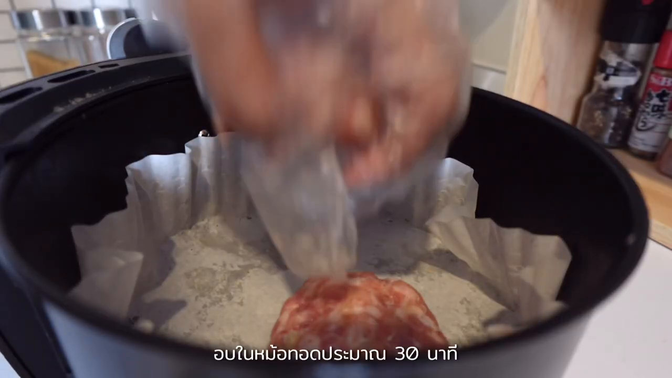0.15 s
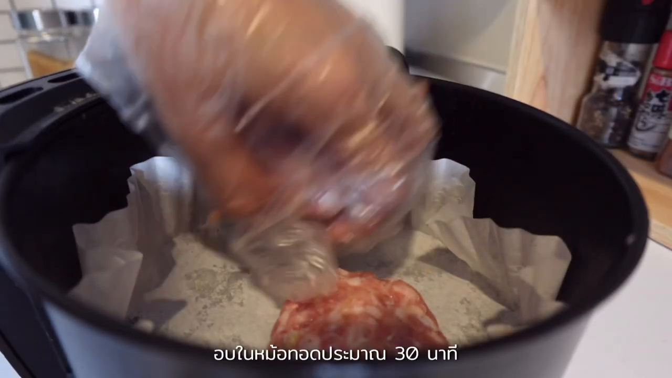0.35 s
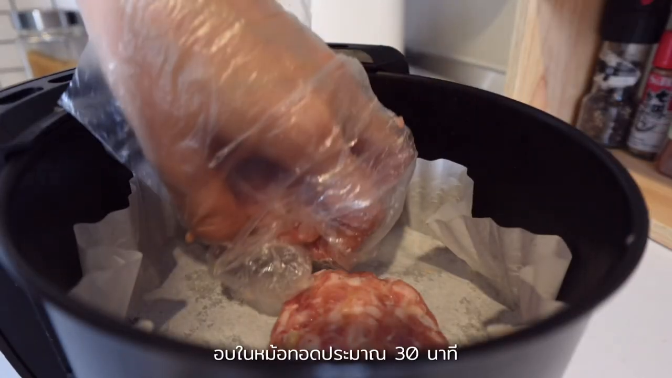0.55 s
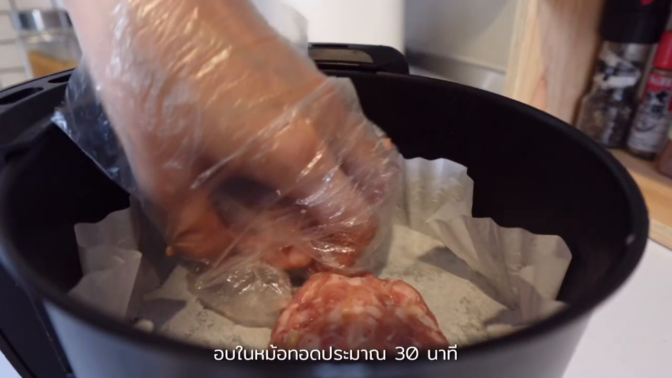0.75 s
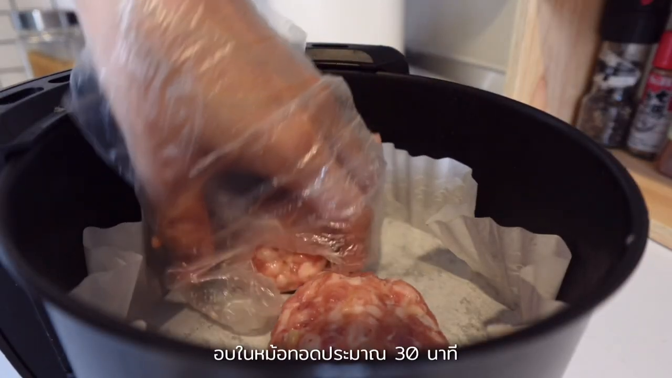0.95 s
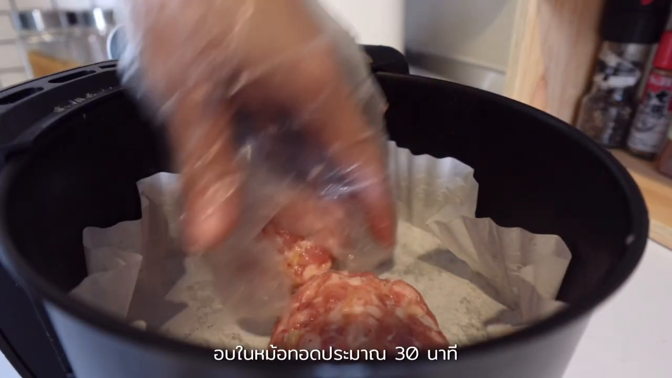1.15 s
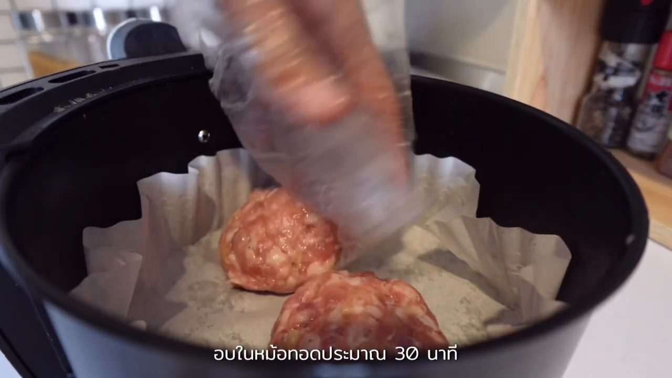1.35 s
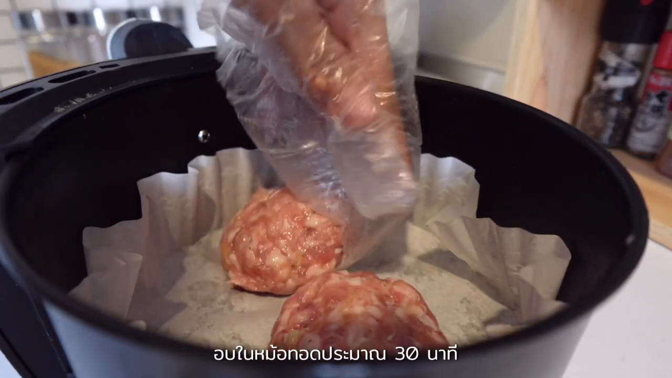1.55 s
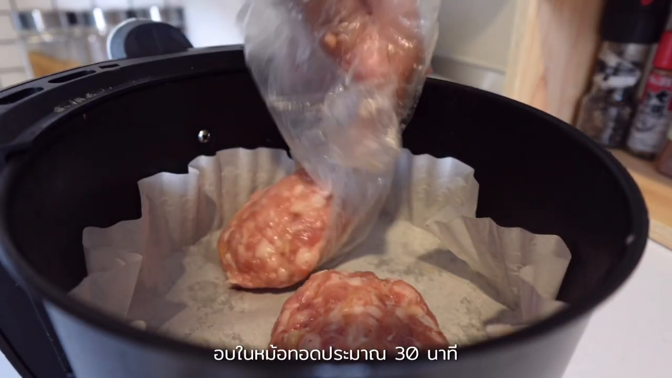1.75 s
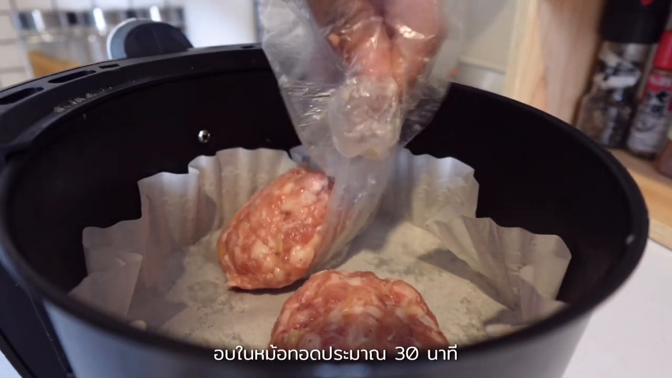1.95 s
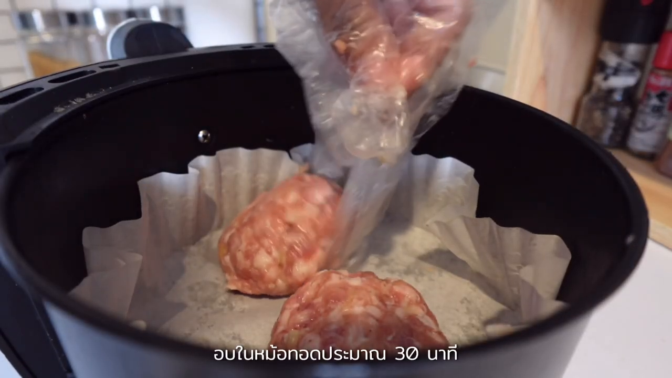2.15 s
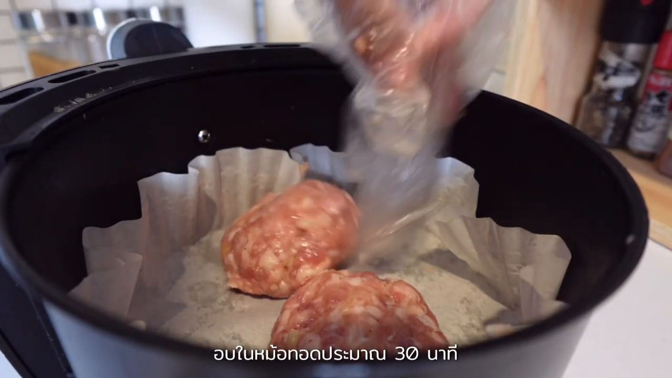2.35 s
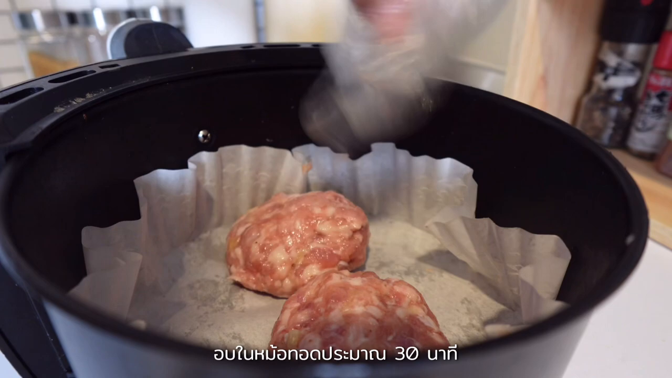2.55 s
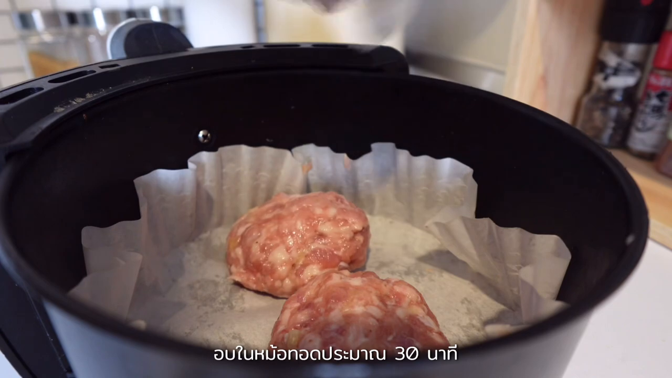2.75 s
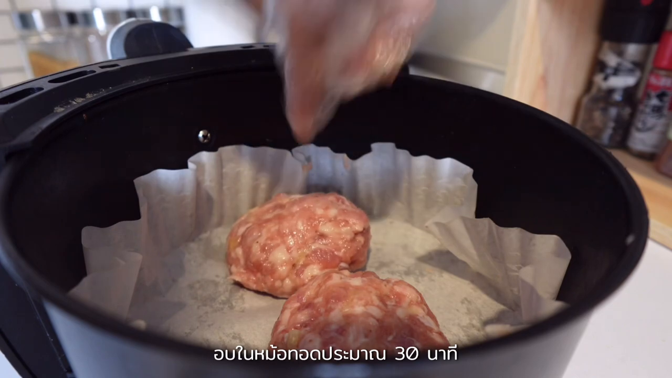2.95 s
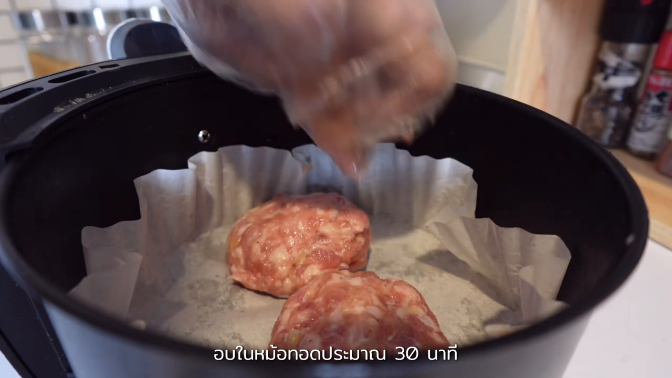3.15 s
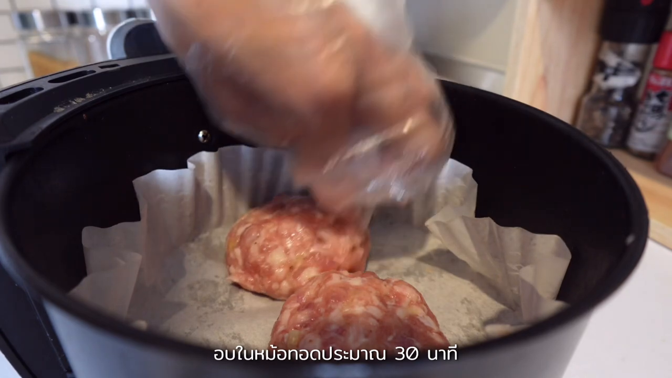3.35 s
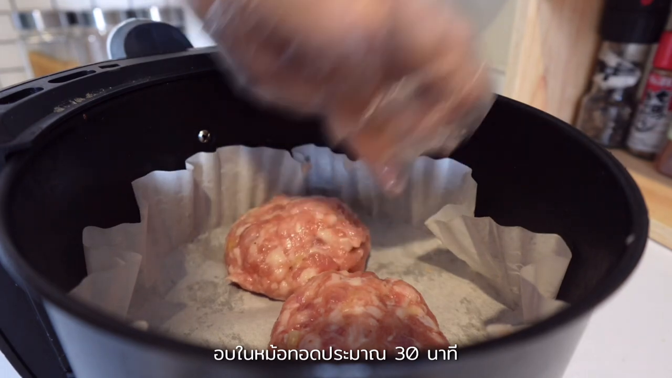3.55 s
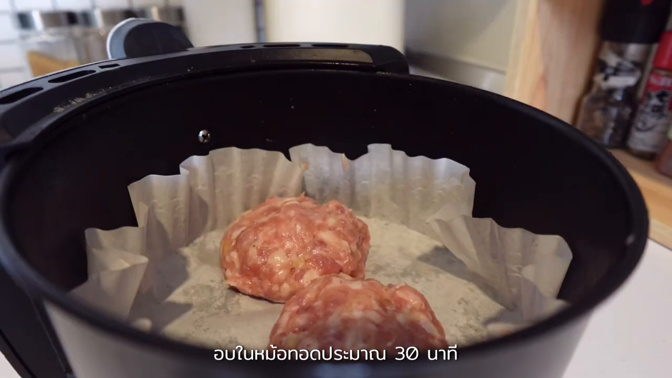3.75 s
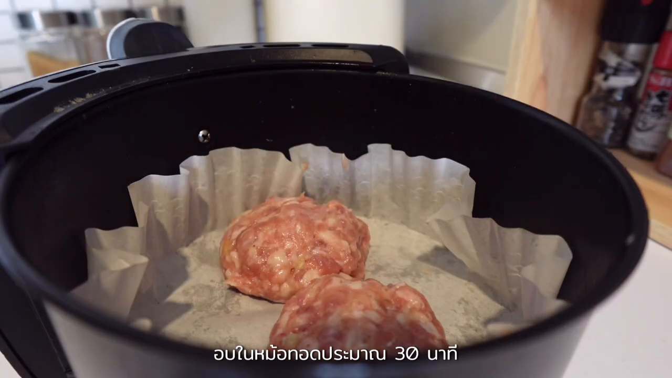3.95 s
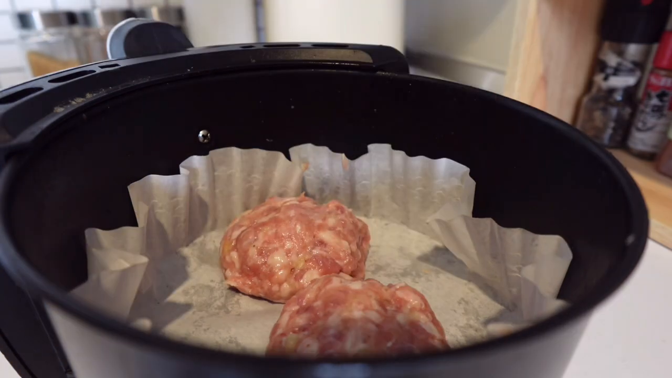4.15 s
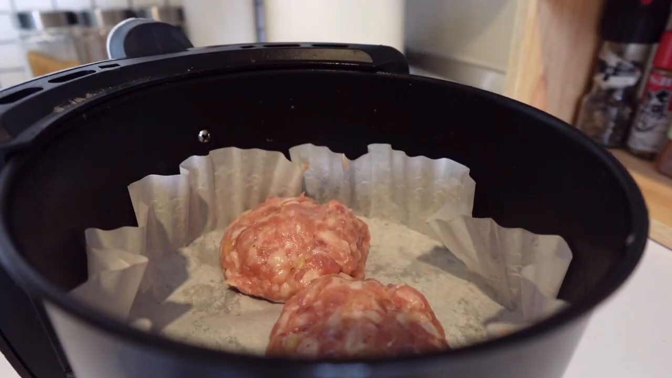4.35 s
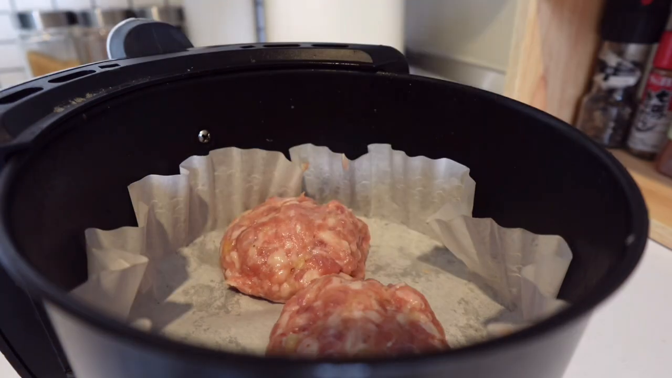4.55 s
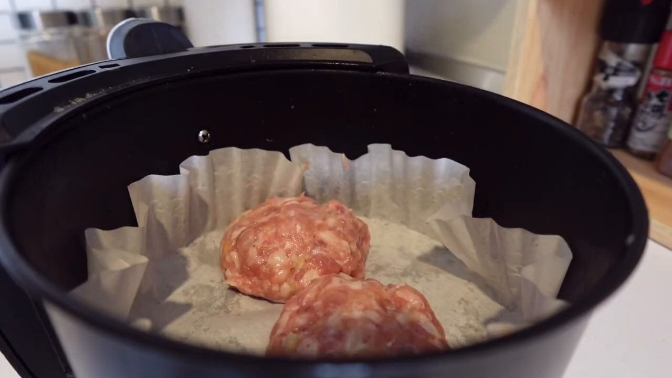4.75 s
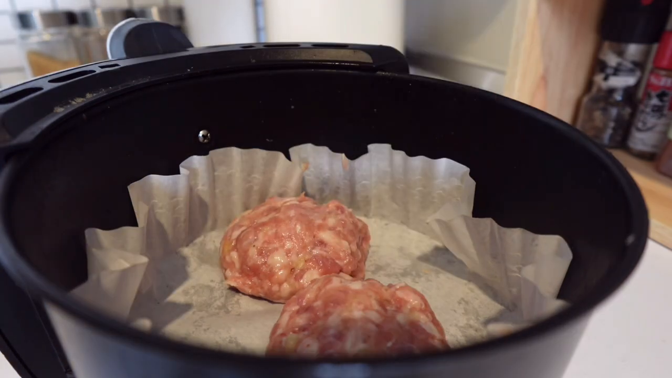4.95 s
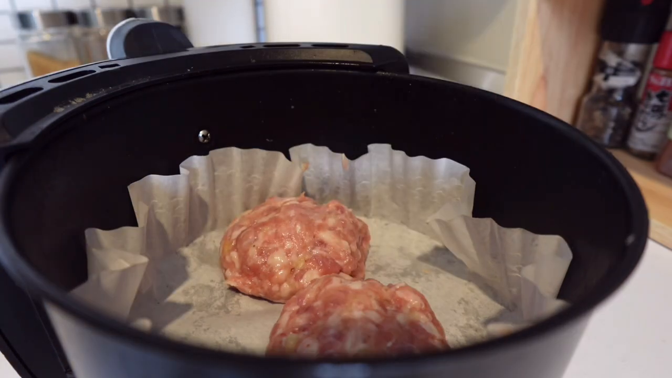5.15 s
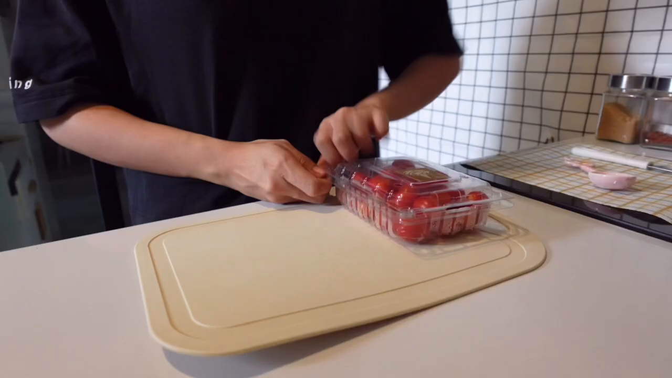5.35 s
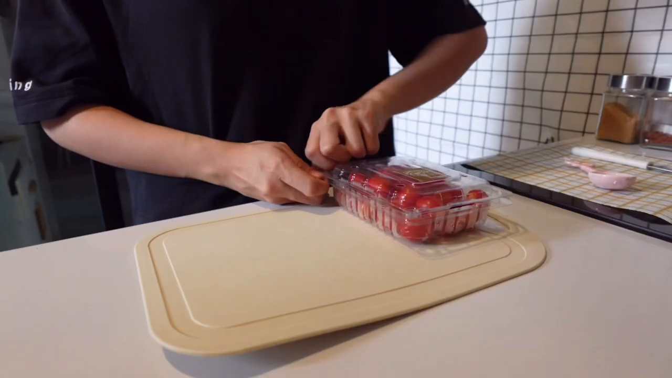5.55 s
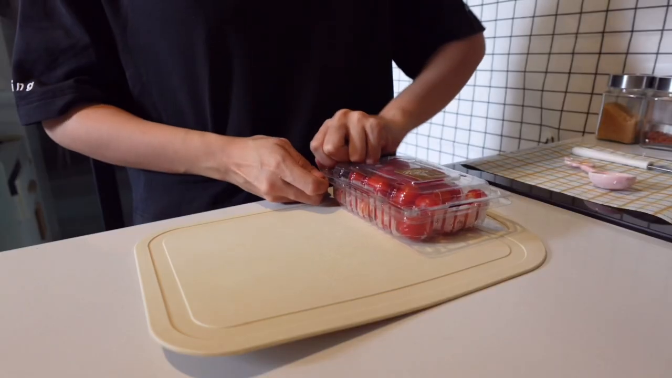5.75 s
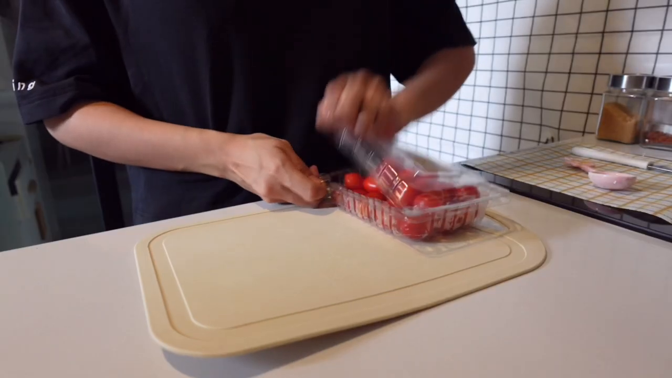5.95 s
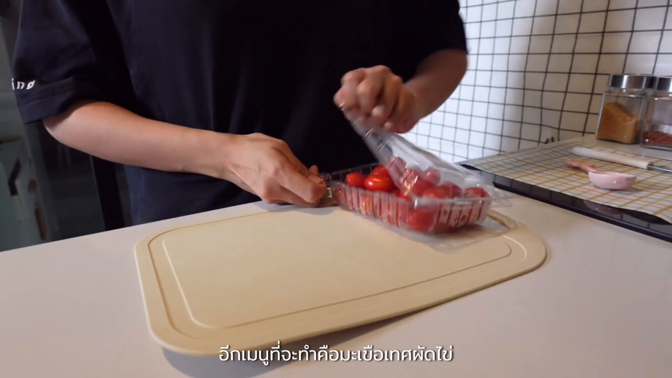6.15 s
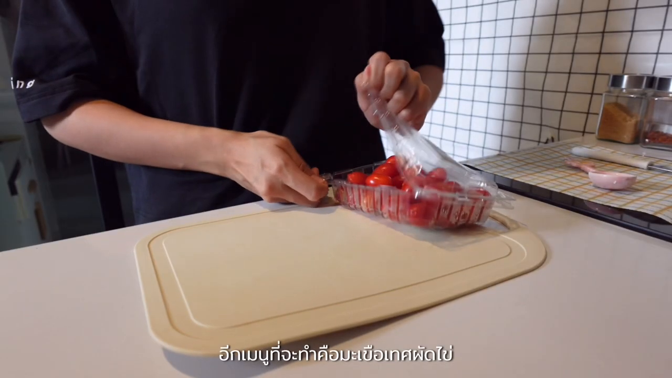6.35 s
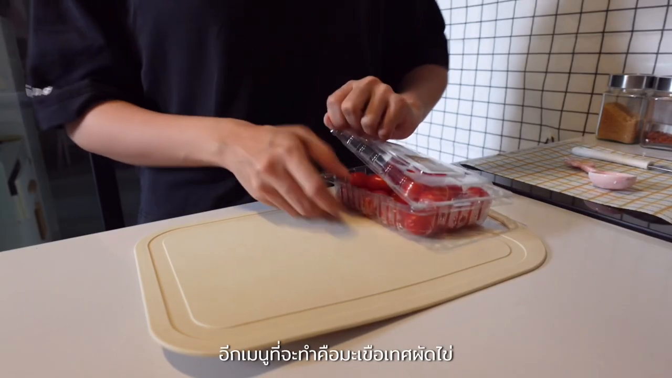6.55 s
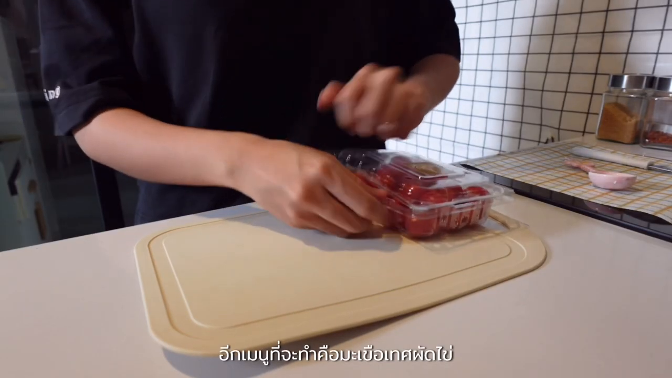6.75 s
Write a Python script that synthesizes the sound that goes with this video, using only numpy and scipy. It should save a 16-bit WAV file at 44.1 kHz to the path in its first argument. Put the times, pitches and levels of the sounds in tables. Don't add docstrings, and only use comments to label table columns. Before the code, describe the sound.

Very close, a thin plastic glove rustles and crackles in uneven squeezes inside a pot, with crisp fold pops and a few short dull paper dents. It stops at a cut, leaving quiet room hum and a faint motor whine. Then, slightly farther off and a little right, a stiff plastic fruit box clicks, snaps and cracks open over louder room hum.

```python
import sys
import numpy as np
from scipy import signal
from scipy.fft import rfft, irfft
from scipy.io import wavfile
from scipy.ndimage import uniform_filter1d

SR = 44100
rng = np.random.default_rng(int(sys.argv[2]) if len(sys.argv) > 2 else 0)


def store_pcm(level_fs):
    pcm = np.round(np.clip(level_fs, -1, 1) * 32767).astype(np.int16)
    wavfile.write(sys.argv[1], SR, np.atleast_2d(pcm).T)


def volts_from_db(level):
    exponent = np.asarray(level, float) / 20
    return 10 ** exponent


N = 304290
T = np.arange(N) / SR

SCENE_CHANGES = [3.722, 5.365]

# pitch in Hz, width in Hz, lift in dB.
POT_RINGS = [(1350, 134, 0), (2055, 76, -2), (2520, 16, -4.5)]
# pitch in Hz, level in dB.
FILM_TONE = [(300, -10), (600, 0.5), (1000, -3.5), (1600, 2), (2400, 1), (4500, -2), (9000, 0), (15000, -1)]
# pitch in Hz, width in Hz, lift in dB.
FILM_RINGS = [(2000, 50, -35), (3500, 310, -13.5), (4540, 1040, -8)]


def glove_film():
    db, depth = hand()
    low_db = db - 19.5 + 24.5 * depth
    high_db = db - 2.5 * depth + 4.5 * np.tanh((T - 1.08) / 0.058) / 2
    folds = level(crackle(1200, spread_db=3, smear_s=.0011), 0) + .9
    low, mid, high = (band(folds * volts_from_db(.8 * walk(25.4)) * rng.standard_normal(N), k) for k in range(3))
    low = colour(low, modes=[(hz, width, db_lift + 4.6) for hz, width, db_lift in POT_RINGS])
    flap = level(ring(folds * rng.standard_normal(N), 320, 0.4), -19)
    close = volts_from_db(db) * (level(mid, 0) + flap)
    close = close + volts_from_db(low_db) * level(low, 0) + volts_from_db(high_db) * level(high, 0)
    close = close - 0.49 * ring(close, 2326, 0.087)
    fade = np.exp(-(T - SCENE_CHANGES[0]) / 0.6) * (T < SCENE_CHANGES[1])
    leaving = volts_from_db(-68.5) * fade * level(mid + .5 * high, 0)
    return np.where(T < 3.752, colour(close, FILM_TONE, FILM_RINGS), leaving)


# middle in seconds, strength in dB, length in seconds, depth in the pot from 0 to 1.
SQUEEZES = [(0.07, -46, 0.2, 0.32), (0.316, -40.5, 0.05, 0.54), (0.39, -37.0, 0.15, 0.6),
            (0.646, -43, 0.1, 0.72), (0.756, -37.5, 0.19, 0.57), (0.841, -30, 0.045, 0.68),
            (1.07, -50, 0.035, 0.65), (1.145, -34.5, 0.24, 0.63), (1.364, -40.4, 0.086, 0.42),
            (1.507, -38.4, 0.072, 0.64), (1.647, -34.5, 0.1, 0.57), (1.795, -42.5, 0.0098, 0.2),
            (1.903, -39.5, 0.1, 0.36), (2.06, -41.5, 0.18, 0.43), (2.182, -39.5, 0.052, 0.31),
            (2.352, -36.5, 0.056, 0.06), (2.396, -36, 0.13, 0.73), (2.545, -31.5, 0.062, 0.3),
            (2.602, -35.5, 0.087, 0.35), (2.703, -31.5, 0.12, 0.26), (2.817, -28.5, 0.062, 0.34),
            (2.935, -34, 0.034, 0.25), (3.019, -40.5, 0.069, 0.37), (3.123, -43, 0.099, 0.4),
            (3.368, -45.5, 0.086, 0.76), (3.524, -56.8, 0.023, 0.3), (3.738, -51.6, 0.048, 0.58)]


def hand():
    power, weighted = volts_from_db(2 * -67), 0
    for s, db, length_s, depth in SQUEEZES:
        squeeze = volts_from_db(2 * db) * np.exp(-2 * np.abs(T - s) / length_s)
        power = power + squeeze
        weighted = weighted + depth * squeeze
    return 10 * np.log10(power) - 3, weighted / power


# start in seconds, peak in dB, ring in Hz, share of low sound in dB.
POPS = [(0.1861, -37, 3850, -15), (0.2435, -37, 4690, -28), (0.2954, -33, 4310, -4),
        (0.5788, -32, 3830, -13), (0.8031, -26, 3270, -8), (0.8303, -20, 3400, -12),
        (0.8445, -17, 2600, -2), (0.8546, -17, 2890, -15), (0.8659, -31, 1660, 12),
        (0.8748, -23, 3680, -23), (0.9539, -29, 3680, -3), (1.6951, -34, 2130, 3), (1.7879, -36, 7990, -27),
        (1.894, -32, 5280, -10), (1.9548, -27, 6120, -25), (1.9684, -31, 4200, -7),
        (2.0607, -31, 5020, -14), (2.4101, -33, 1550, 4), (2.5213, -29, 6370, -5), (2.5378, -31, 7450, 0),
        (2.8364, -22, 3340, -9), (3.343, -41, 6740, -11), (3.3674, -36, 4760, -8), (3.3975, -33, 3450, -18),
        (3.4752, -43, 2690, -11), (3.5129, -44, 4240, -13), (3.54, -44, 5210, -14),
        (3.5701, -43, 4670, -33), (3.5992, -48, 3890, -24), (3.6862, -41, 5870, -16)]
# ring in Hz, share of high sound in dB.
POP_TREBLE = [(3000, -8), (4000, -8), (6000, 5)]


def film_pops():
    pops = []
    for s, db, hz, low_db in POPS:
        high_db = np.interp(hz, *np.transpose(POP_TREBLE))
        pops.append((s, db, low_db, high_db, hz, .0017))
    return ticks(pops, width=.3, ring_db=-5)


# start in seconds, peak in dB, ring in Hz, push in seconds, share of high sound in dB.
DENTS = [
    (1.7215, -16.5, 1710, .003, -22),
    (2.461, -13.5, 1830, .0043, -13),
    (3.413, -24, 2090, .006, -16),
    (3.728, -38.5, 4750, .0096, 7),
]
# pitch in Hz, level in dB.
THIN_TONE = [(400, -15), (800, -9), (1150, -4), (16000, -4)]


def paper_dents():
    dents = [(s, db, -4, high_db, hz, push_s) for s, db, hz, push_s, high_db in DENTS]
    return colour(ticks(dents, width=.25, ring_db=0), THIN_TONE)


# start in seconds, peak in dB, share of low sound in dB,
# share of high sound in dB, ring in Hz, push in seconds.
SQUEAK = [
    (3.616, -67.5, 5.5, -15, 2140, .028),
]


def finger_squeak():
    return ticks(SQUEAK, width=.14, ring_db=14)


def box():
    folds = level(crackle(600, spread_db=0.5, smear_s=0.0036), 0) + .9
    snaps = catches_and_clicks() + lid_cracks() + finger_knocks()
    return box_handling(folds) + swells(folds) + snaps + box_thud()


# start in seconds, peak in dB, ring in Hz.
CATCHES = [
    (5.8772, -12, 5040),
    (5.8778, -16, 3000),
    (6.1978, -10, 3510),
    (6.2634, -8, 4220),
    (6.3845, -25, 6160),
]
# start in seconds, peak in dB, ring in Hz.
CLICKS = [(5.4049, -37, 6000), (5.553, -24, 5230), (5.575, -25, 7000), (5.6561, -26, 6870),
          (5.6858, -22, 6850), (6.4772, -30, 2820), (6.7095, -34, 4870), (6.7289, -15, 8200)]


def catches_and_clicks():
    catches = with_tone(CATCHES, low_db=-30, high_db=-20, push_s=.001)
    clicks = with_tone(CLICKS, low_db=-12, high_db=2, push_s=.0006)
    return colour(ticks(clicks + catches, width=.14, ring_db=2), THIN_TONE)


# start in seconds, peak in dB, ring in Hz, push in seconds.
CRACKS = [
    (5.5768, -9.5, 1250, .003),
    (5.9059, -10, 1500, .0013),
    (6.7155, -24, 1310, .006),
]


def lid_cracks():
    cracks = [(s, db, -1, 0, hz, push_s) for s, db, hz, push_s in CRACKS]
    return colour(ticks(cracks, width=.3, ring_db=-1), THIN_TONE)


# start in seconds, peak in dB, ring in Hz.
KNOCKS = [(5.3725, -47, 1400), (5.5301, -42, 710), (6.0913, -43, 1380), (6.1228, -43, 1530),
          (6.1905, -36, 950), (6.227, -39, 1200), (6.3234, -36, 1000), (6.4702, -37, 1400),
          (6.5138, -35, 1400), (6.6593, -47, 1440), (6.7215, -26, 1350), (6.7243, -24, 2100),
          (6.8644, -38, 1360)]


def finger_knocks():
    knocks = with_tone(KNOCKS, low_db=11, high_db=-14, push_s=.002)
    return volts_from_db(-4) * ticks(knocks, width=.3, ring_db=1)


# start in seconds, peak in dB, ring in Hz, swell in seconds, share of low sound in dB.
LID_SWELLS = [(5.366, -40.5, 1320, 0.01, 6.5), (5.579, -17, 1225, .025, 0.5),
              (5.686, -34, 2530, 0.018, -16), (5.907, -13, 2470, .029, -3), (6.188, -42, 940, 0.00038, 16),
              (6.47, -39, 1350, .01, 6.5), (6.511, -52, 1400, 0.0068, 9), (6.715, -25, 1365, 0.017, 4.5),
              (6.863, -45, 1320, 0.0093, 10)]
# start in seconds, peak in dB, ring in Hz, swell in seconds, share of high sound in dB.
CATCH_SWELLS = [(5.551, -45, 5100, 0.0058, 15), (5.877, -24, 2760, 0.0081, -18),
                (6.199, -31.5, 3500, 0.014, -23), (6.266, -25, 4290, 0.019, -28),
                (6.385, -43, 4330, 0.015, 0)]
# pitch in Hz, level in dB.
LID_TONE = [(400, 0.5), (800, -5), (1200, 2), (2000, -6.5), (3300, -1), (6500, -4), (11000, -5),
            (14000, -13)]
# pitch in Hz, width in Hz, lift in dB.
LID_SWELL_RINGS = [(2140, 280, 1.5), (2750, 160, -3), (3360, 120, -2.5), (5050, 230, -12), (6600, 220, -4)]


def swells(folds):
    events = [(s, db, hz, swell_s, low_db, -3.5) for s, db, hz, swell_s, low_db in LID_SWELLS]
    events += [(s, db, hz, swell_s, -18, high_db) for s, db, hz, swell_s, high_db in CATCH_SWELLS]
    out, t = np.zeros(N), np.arange(12000) / SR
    duck = .2
    for s, peak_db, hz, swell_s, low_db, high_db in events:
        shape = (duck + t / swell_s) * np.exp(1 - duck - t / swell_s)
        ring_db = 4 if hz > 3000 else -8
        out = lay(out, s, volts_from_db(peak_db) * burst(shape, low_db, high_db, hz, .14, ring_db, fall_hz=6000))
    return colour(out * np.sqrt(folds / folds.mean()), LID_TONE, LID_SWELL_RINGS)


# pitch in Hz, width in Hz, lift in dB.
LID_RINGS = [(1200, 390, -4.5), (2080, 88, -15)]
# time in seconds, level in dB.
LID_BENDING = [(5.42, -88), (5.54, -76), (5.75, -69), (5.96, -48), (6.09, -50), (6.17, -58), (6.55, -60),
               (6.9, -60)]


def box_handling(folds):
    low = band(folds * rng.standard_normal(N), 0)
    low = colour(low, modes=[(hz, width, db + 6) for hz, width, db in LID_RINGS])
    upper = band(folds * rng.standard_normal(N), 1)
    bending = volts_from_db(np.interp(T, *np.transpose(LID_BENDING)))
    return (level(low, -51) + bending * level(upper, 0)) * (T > SCENE_CHANGES[1])


# start in seconds, peak in dB, share of low sound in dB,
# share of high sound in dB, ring in Hz, push in seconds.
THUD = [
    (6.722, -58.5, 10.8, -20, 364, .02),
]


def box_thud():
    return ticks(THUD, width=.32, ring_db=19)


# pitch in Hz, level per Hz in dB.
QUIET_ROOM = [(15, -61), (25, -23.5), (129, -1.5), (246, -6.5), (421, -11), (509, -13.5), (552, -9.5),
              (631, -15.5), (945, -19), (1340, -13.5), (2010, -21), (3340, -26), (8810, -36), (9810, -28.5),
              (15500, -51)]
# pitch in Hz, level per Hz in dB.
BUSY_ROOM = [(15, -61), (25, -41), (116, -4.5), (160, -2.5), (227, 0.5), (289, -2.5), (495, -6),
             (919, -14.5), (1270, -8), (2060, -14.5), (2700, -10.5), (3090, -22), (3440, -18),
             (9810, -34.5), (15500, -37)]
# pitch in Hz, width in Hz, lift in dB.
ROOM_RINGS = [(67, 6.1, 12.5), (130.8, 4.9, 7), (197.3, 6.6, 7), (235.4, 25.4, 7), (1320, 18, -24),
              (3377, 35, 9.5)]
ROOM_LEVELS = [-60, -55, -41.5]


def room_hum():
    quiet = level(colour(rng.standard_normal((2, N)), QUIET_ROOM, ROOM_RINGS), 0)
    busy = level(colour(rng.standard_normal((2, N)), BUSY_ROOM, ROOM_RINGS), 0)
    place = np.searchsorted(SCENE_CHANGES, T)
    return np.where(place < 2, quiet, busy) * volts_from_db(np.array(ROOM_LEVELS)[place] + .5 * walk(2.68))


# pitch in Hz, average level in dB.
MOTOR_TONES = [(506.0, -73), (646.0, -75), (1077, -79), (1367, -68), (1513, -80), (3413, -82), (9421, -91),
               (9485, -87), (9636, -91), (9701, -77), (9916, -92), (9997, -91), (10061, -82), (13927, -90)]


def camera_motor():
    drift = np.cumsum(1 + .00015 * walk(3)) / SR
    whine = 0
    for hz, db in MOTOR_TONES:
        tone = np.sin(2 * np.pi * (hz * drift + rng.random((2, 1))))
        whine = whine + np.sqrt(2) * volts_from_db(db + 0.75 * walk(24)) * tone
    return whine * volts_from_db(np.array([-8, 0, -3])[np.searchsorted(SCENE_CHANGES, T)])


def level(x, db):
    return x * volts_from_db(db) / np.sqrt(np.mean(x ** 2))


def colour(x, points=None, modes=()):
    hz = np.maximum(np.fft.rfftfreq(x.shape[-1], 1 / SR), 1)
    gain = np.ones(len(hz))
    if points is not None:
        point_hz, point_db = np.transpose(points)
        gain = volts_from_db(np.interp(np.log(hz), np.log(point_hz), point_db))
    lift = 1 + sum(volts_from_db(db) / (1 + (2 * (hz - f) / w) ** 2) for f, w, db in modes)
    return irfft(rfft(x) * gain * lift, x.shape[-1])


BAND_EDGES = [550, 2500, 7000, 16500]


def band(x, index):
    edges = BAND_EDGES[index:index + 2]
    return signal.sosfilt(signal.butter(2, edges, "bandpass", fs=SR, output="sos"), x)


def ring(x, hz, width):
    return signal.lfilter(*signal.iirpeak(hz, 1 / width, SR), x)


def walk(rate):
    k = int(SR / rate)
    w = uniform_filter1d(np.repeat(rng.standard_normal(N // k + 1), k), k)[:N]
    return w / w.std()


def crackle(rate, spread_db, smear_s):
    size = np.minimum(rng.exponential(size=N), 4)
    kicks = (rng.random(N) < rate / SR) * volts_from_db(2 * spread_db * size)
    return np.sqrt(signal.lfilter([1], [1, -np.exp(-2 / (smear_s * SR))], kicks) + 1e-9)


def lay(out, s, sound):
    i = int(s * SR)
    return np.concatenate([out[:i], out[i:i + len(sound)] + sound[:N - i], out[i + len(sound):]])


def burst(shape, low_db, high_db, hz, width, ring_db, fall_hz):
    x = rng.standard_normal((4, len(shape)))
    low = band(x[0] * shape, 0)
    middle = band(x[1] * shape ** 1.06, 1)
    soft = signal.lfilter(*signal.butter(1, fall_hz, fs=SR), x[2])
    high = band(soft * shape ** 1.08, 2)
    struck = ring(ring(x[3] * shape, hz, width), hz, 2 * width)
    lean_db = low_db if hz < BAND_EDGES[1] else 0
    parts = [(low, low_db), (middle, 0), (high, high_db), (struck, ring_db + lean_db)]
    return sum(volts_from_db(db) * p / np.abs(p).max() for p, db in parts)


def ticks(events, width, ring_db):
    out, t = np.zeros(N), np.arange(2500) / SR
    for s, peak_db, low_db, high_db, hz, push_s in events:
        shape = np.exp(-(t / push_s) ** 1.5) + volts_from_db(-21) * np.exp(-t / .01)
        out = lay(out, s, volts_from_db(peak_db) * burst(shape, low_db, high_db, hz, width, ring_db, fall_hz=14500))
    return out


def with_tone(table, low_db, high_db, push_s):
    return [(s, db, low_db, high_db, hz, push_s) for s, db, hz in table]


# pitch in Hz, difference in dB.
BOX_SIDE = [(500, -11), (1500, -14), (5000, -13), (9000, -12), (13000, -20)]
# pitch in Hz, difference in dB.
HUM_SIDE = [(60, -21), (110, -15.5), (200, -18), (380, -6.5), (700, -5), (1290, -13), (2380, -11.5),
            (4400, -7.5), (8120, -10), (15000, -15)]


def scene():
    hum, other_hum = room_hum() + camera_motor()
    near = glove_film() + film_pops() + paper_dents() + finger_squeak()
    far = box()
    t = np.arange(4096) / SR
    scatter = level(rng.standard_normal(len(t)) * np.exp(-t / .012), -10 * np.log10(len(t)))
    side = signal.fftconvolve(volts_from_db(-33) * near + colour(far, BOX_SIDE), scatter)[:N]
    side = side + colour(other_hum, HUM_SIDE) * volts_from_db(-4. * (T > SCENE_CHANGES[1]))
    side = side - volts_from_db(-25) * far
    hiss = volts_from_db(-77.5) * rng.standard_normal(N)
    mid = near + far + hum + hiss
    return np.array([mid + side, mid - side])


def band_limit(x):
    return signal.sosfilt(signal.butter(12, 16970, fs=SR, output="sos"), x)


def record(dry):
    x = signal.sosfilt(signal.butter(2, 45, "highpass", fs=SR, output="sos"), dry)
    x = signal.sosfilt(signal.ellip(10, .2, 45, 15800, fs=SR, output="sos"), x)
    return band_limit(x)


dry = scene()
out = record(dry)
store_pcm(out)
```